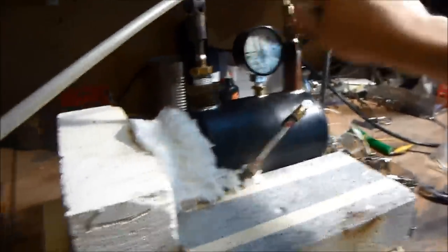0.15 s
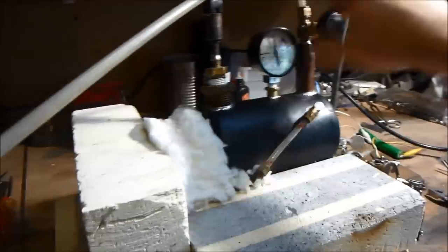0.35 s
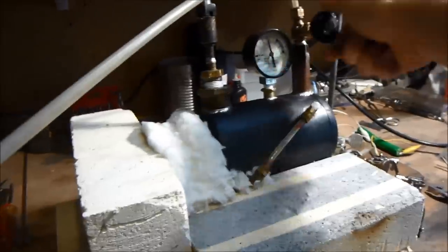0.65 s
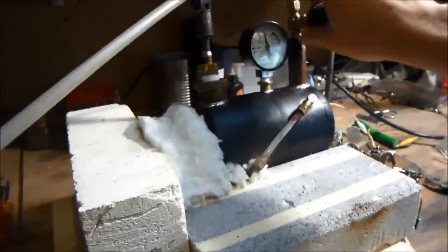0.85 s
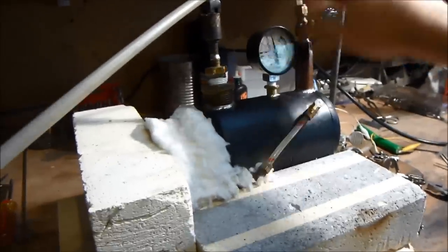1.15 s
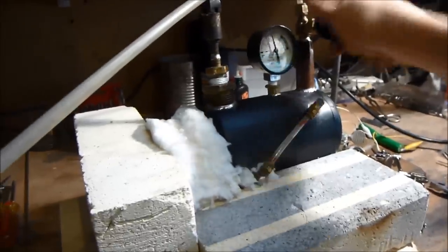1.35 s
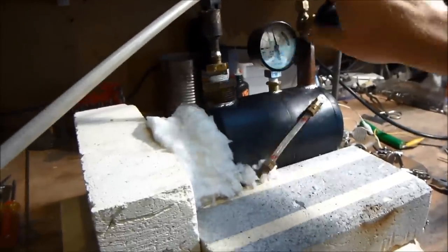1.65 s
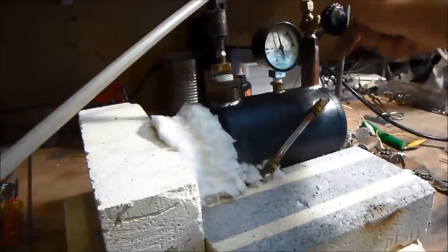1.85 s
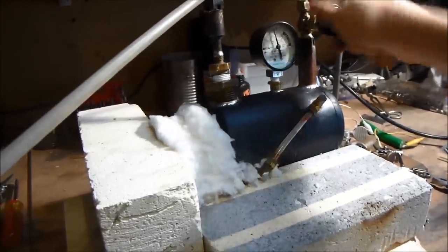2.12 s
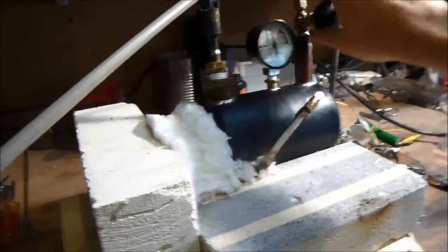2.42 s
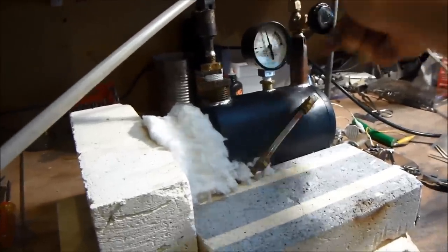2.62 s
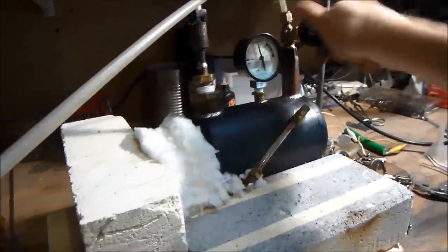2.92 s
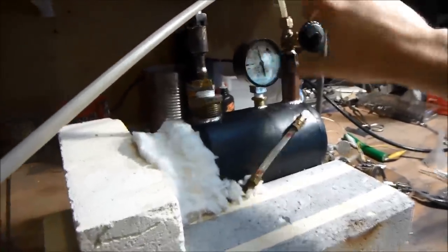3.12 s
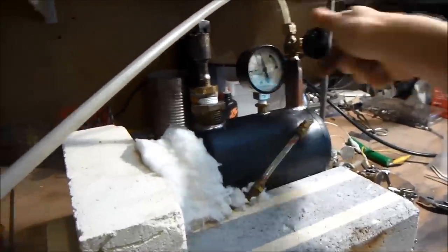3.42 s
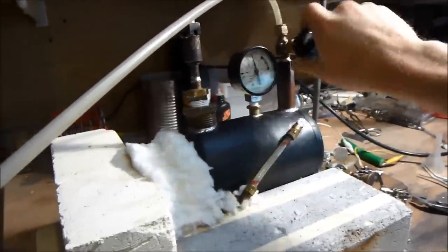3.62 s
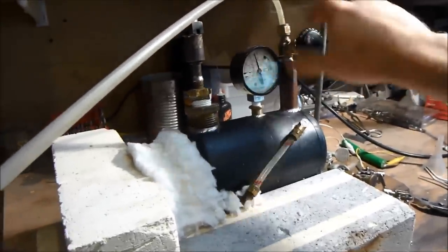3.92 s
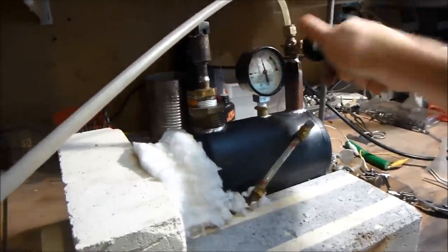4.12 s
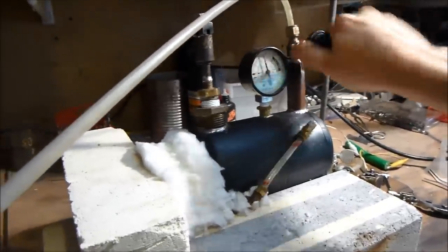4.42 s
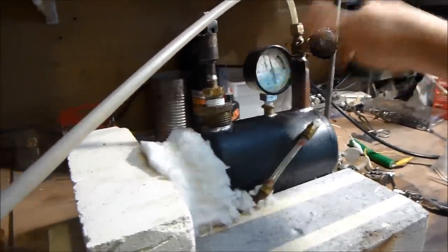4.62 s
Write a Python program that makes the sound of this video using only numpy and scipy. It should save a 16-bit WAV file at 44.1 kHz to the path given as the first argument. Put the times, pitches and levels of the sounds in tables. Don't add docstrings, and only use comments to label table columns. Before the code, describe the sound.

A small boiler on a workshop bench feeds pressurised steam through a hand valve and thin line. From 0 to about 4.8 seconds a loud, bright hiss runs without a break, strongest in the high treble, with a fine restless flutter. It begins a touch lower, swells by 0.4 seconds, eases around 0.75, then holds nearly level, with slight surges near 3.0 and 3.5. Beneath it, flow noise rings in the pipework and shell as a rough midrange rush leaning left, very gradually growing. A soft burner roar lies far below. The hand on the wheel makes faint, lumpy low thuds near 0.1, 0.5, 1.3, 3.3 and 4.2 seconds, the one at 1.3 strongest, with fainter touches near 2.2 and 4.0. The small stereo camera sounds close and wide, its treble slightly grainy; the extreme top opens intermittently, mostly after 3 seconds.

```python
import sys
import numpy as np
from scipy import signal
from scipy.fft import rfft, irfft
from scipy.io import wavfile
from scipy.ndimage import uniform_filter1d

SR = 44100
rng = np.random.default_rng(int(sys.argv[2]) if len(sys.argv) > 2 else 0)


def generate_wav(sig):
    pcm = np.round(np.clip(np.atleast_2d(sig).T, -1, 1) * 32767).astype(np.int16)
    wavfile.write(sys.argv[1], SR, pcm)


def linear_from_db(decibels):
    return 10 ** (np.asarray(decibels, float) / 20)


N = 210029

# f/Hz, level per Hz/dB, left-right/dB
JET_WASH = [(7200, -28, 0), (7400, -5, 2), (8500, -10, -3), (9700, -4, 2), (11000, -5, -3), (12000, -3, -2),
            (13000, -2, -3), (14000, 0, -3), (14600, -8, -3), (15200, -12, -1), (15700, -14, 0),
            (16000, -40, 0)]
# f/Hz, width/Hz, level over the wash/dB, left-right/dB, gain while opening/dB
JET_MODES = [(7630, 70, -1, 9, 5), (9930, 270, -2, 6, 4), (7990, 250, 3, 2, 3), (8110, 40, 3, 1, 7),
             (8290, 250, 6, 3, 6), (8540, 200, 6, 3, 1), (8700, 120, 5, 4, 2), (8840, 120, 4, 4, 0),
             (9060, 340, 3, 4, 2), (10310, 260, 1, 0, 5), (10710, 470, 7, 2, 7), (10980, 140, 8, 1, 4),
             (11160, 190, 7, 3, 7), (11280, 80, 6, 5, -3),
             (11470, 200, 8, 4, 0), (11820, 400, 10, 4, 0), (12180, 340, 11, 2, -3),
              (12520, 270, 11, 4, -6), (12870, 220, 1, 6, 0), (13020, 90, 6, 1, 1), (13350, 460, 5, 5, 5),
              (13680, 280, 9, 3, 2), (13850, 220, 10, 4, -1), (14120, 190, 8, 4, -6),
              (14340, 170, 5, 5, -5), (14550, 500, 6, 2, -2), (14820, 80, 4, 4, 0), (14990, 250, 5, 2, 0)]


def jet():
    hiss = turbulence(JET_WASH, JET_MODES, wash_same=0.89, mode_same=0.52,
                      wander_db=-0.5, patchy_db=0.5, ripple_db=2.0, twist_rad=0.88, fill_db=-0.5)
    return linear_from_db(pressure_db()) * flutter(0.22, 9.4, 100.0) * hiss


# t/s, jet level/dB
PRESSURE = [(0, -25.5), (.44, -23), (.75, -24.5), (1.3, -24.5), (2.0, -24), (2.3, -24), (3.05, -23),
            (3.3, -23.5), (3.5, -23), (3.85, -24.6), (4.3, -23.5), (4.76, -23.5)]


def pressure_db():
    at, db = np.transpose(PRESSURE)
    return np.interp(np.arange(N) / SR, at, db)


# f/Hz, level per Hz/dB, left-right/dB
PIPE_WASH = [(1350, -35, 0), (1450, -11, -3), (1800, -7, 3), (2300, 0, 6), (2800, -9, 5), (3300, -2, 5),
             (4300, -1, 6), (5200, -4, -3), (6200, -7, -3), (7400, -2, 4), (7600, -25, 0)]
# f/Hz, width/Hz, level over the wash/dB, left-right/dB, gain
# while opening/dB
PIPE_MODES = [(1646, 280, 10, 6, 2), (1895, 60, 0, 14, 1), (2080, 60, 7, 5, 4), (2170, 190, 1, 10, 5),
              (2630, 140, 2, 7, 0), (2880, 120, -3, 12, 6), (3140, 90, 6, 7, 2), (3330, 80, 6, 8, -1),
              (3480, 70, 5, 11, -2), (3630, 110, 2, 6, -2), (3730, 70, 6, 9, 0), (3940, 140, 8, 4, -2),
              (4050, 50, 4, 10, 1), (4180, 160, 4, 7, -3),
              (4580, 180, 8, 6, 0), (4810, 170, 9, 3, 0), (5140, 230, 4, 6, -2), (5270, 120, 4, 10, -1),
              (5440, 140, 5, 7, -1), (5660, 280, 6, 4, 0), (5850, 150, 6, 8, 1), (6000, 60, 5, 4, 7),
              (6160, 240, 7, 4, -1), (6320, 250, 5, 4, -1), (6580, 140, 9, 3, 5), (6760, 380, 6, 3, 2),
              (7190, 200, -2, -3, 5)]


def pipework():
    hiss = turbulence(PIPE_WASH, PIPE_MODES, wash_same=0.58, mode_same=0.53,
                      wander_db=0.42, patchy_db=0.33, ripple_db=2.12, twist_rad=0.55, fill_db=0.5)
    filling = follower(start_db=-30, rise_db_per_s=0.48, share=0.14)
    return filling * flutter(0.49, 6.3, 30.0) * hiss


# f/Hz, level per Hz/dB, left-right/dB
BURNER_WASH = [(120, -37, 0), (158, -11.5, -3), (228, 2, 0), (416, 1, 3), (700, -3.5, 5), (1065, -4.5, 5),
               (1424, -2.5, 0), (1620, 1, 0)]
# f/Hz, width/Hz, level over the wash/dB, left-right/dB, gain while opening/dB
BURNER_MODES = [(191.4, 51, 11.2, -2.5, -3), (273.6, 25.5, 14.9, 2.5, 2.5), (352.4, 116, 10.8, -1, -2.1),
                (558, 315, 8.8, -2, 1.5), (772, 108, 12.1, -2, 0), (921.5, 54, 10.5, 15, -3),
                (1054, 115, 13.2, -8.5, -2), (1261, 96, 9.5, 18.5, -0.5), (1396, 140, 9, 14, -1.5)]


def burner():
    roar = turbulence(BURNER_WASH, BURNER_MODES, wash_same=0.54, mode_same=0.79,
                      wander_db=-0.17, patchy_db=0.63, ripple_db=1.84)
    flame = follower(start_db=-48.5, rise_db_per_s=0.7, share=0.047)
    return flame * flutter(0.37, 2.5, 14.0) * roar


def follower(start_db, rise_db_per_s, share):
    surge_db = pressure_db() - pressure_db().mean()
    return linear_from_db(start_db + rise_db_per_s * np.arange(N) / SR + share * surge_db)


# f/Hz, level per Hz/dB, left-right/dB
RUMBLE_WASH = [(40, -30, 0), (65, -12, 0), (90, -11, 0), (116, 7, 0), (147.6, 12.5, 0), (188, -42, 0)]
# f/Hz, width/Hz, level over the wash/dB, left-right/dB, gain while opening/dB
BENCH_MODE = [(105, 40, -20, 0, 0)]


def rumble():
    lumps = turbulence(RUMBLE_WASH, BENCH_MODE, 0.65, 0.65, wander_db=0, patchy_db=0, ripple_db=0)
    power = uniform_filter1d(lumps.mean(0) ** 2, size=2500)
    return thuds() * lumps / np.sqrt(power + 0.05)


# t/s, level/dB
THUDS = [
    (0.089, -53),
    (0.525, -54.5),
    (1.344, -47),
    (2.169, -58),
    (3.306, -52),
    (3.993, -58),
    (4.179, -54),
]
# start t/s, length/s
LULLS = [(0.174, .28), (0.718, 0.057), (.86, 0.05), (1.08, .12), (1.5, .04), (1.87, .08), (2.27, 0.15),
         (2.482, 0.11), (2.65, .07), (2.808, .09), (3.11, 0.12), (3.86, 0.047), (4.23, .08), (4.6, 0.064)]


def thuds():
    rise_s, t60_s, edge_s = 0.03, 0.4, 0.04
    t = np.arange(0, N + 64, 64) / SR
    at, db = np.transpose(THUDS)
    since = np.maximum(t - at[:, None] + rise_s, 0)
    decay = linear_from_db(db[:, None] - 3.5 - 60 * since / t60_s)
    swell = np.minimum(since / rise_s, 1) * decay
    tremor = linear_from_db(-65.5 + 2.5 * chance(t, 3.0, 14.0)[0])
    still = 0
    for start, length in LULLS:
        inside_s = np.minimum(t - start, start + length - t)
        still = still + np.clip(0.5 + inside_s / edge_s, 0, 1)
    gain = np.sqrt((swell ** 2).sum(0) + tremor ** 2) * linear_from_db(-14 * still)
    return np.interp(np.arange(N) / SR, t, gain)


# f/Hz, level per Hz/dB, left-right/dB
HISS_WASH = [(5, 0, 0), (25, 12, 0), (50, -38, 0), (90, -41, 0), (200, -38, 0)]


def microphone_drift():
    return linear_from_db(-70) * turbulence(HISS_WASH, BENCH_MODE, 0.1, 0.1, wander_db=0, patchy_db=0, ripple_db=0)


def turbulence(wash, modes, wash_same, mode_same, wander_db, patchy_db, ripple_db, twist_rad=0.47, fill_db=0.):
    frames, hz = N // 512 + 5, np.fft.rfftfreq(2048, 1 / SR)
    t = np.arange(frames) * 512 / SR
    opening = t * SR / N - 0.5
    side = np.array([0.5, -0.5])[:, None, None]

    at, wash_db, wash_pan = np.transpose(wash)
    log_hz = np.log(hz + 1)
    shape_db = np.interp(log_hz, np.log(at), wash_db)[:, None]
    pan_db = np.interp(log_hz, np.log(at), wash_pan)[:, None]
    shape = linear_from_db(shape_db) * ((hz >= at[0]) & (hz <= at[-1]))[:, None]
    scattered = linear_from_db(side * pan_db + fill_db * opening) ** 2

    f, width, db, lean_db, growth_db = np.transpose(modes)
    peaks = 1 / (1 + (2 * (hz[:, None] - f) / (0.74 * width)) ** 2) ** 2
    wander = wander_db * chance(t, 0.4, 5.0, count=len(f))
    mode_db = db[:, None] + 1.6 + growth_db[:, None] * opening + wander
    ringing = peaks @ linear_from_db(mode_db + side * lean_db[:, None]) ** 2
    power = scattered + ringing
    shared = (wash_same * scattered + mode_same * ringing).sum(0) / power.sum(0)

    a, b, c, d, patches, ripple, twist = rng.standard_normal((frames, len(hz), 7)).T
    twist = smoothed(twist, 8, 200, "reflect")
    ripple = smoothed(ripple, 2, 16, "wrap")
    patches = smoothed(patches, 20, 5, "wrap")

    same = np.clip(shared + 0.18 * ripple, 0, 1)
    left, other = a + 1j * b, c + 1j * d
    turn = np.exp(1j * twist_rad * twist)
    z = np.array([left, same * turn * left + np.sqrt(1 - same ** 2) * other])
    z *= shape * np.sqrt(power) * linear_from_db(patchy_db * patches + ripple_db * ripple)
    sound = signal.istft(z, nperseg=2048, noverlap=1536)[1][:, :N]
    return sound / np.sqrt(np.mean(sound.mean(0) ** 2))


def smoothed(grain, bins, frames, edge):
    grain = uniform_filter1d(grain, size=bins, axis=0)
    return evened(uniform_filter1d(grain, size=frames, axis=1, mode=edge))


def flutter(depth_db, lo_hz, hi_hz):
    t = np.arange(0, N + 64, 64) / SR
    curve = chance(t, lo_hz, hi_hz)[0]
    return linear_from_db(depth_db * np.interp(np.arange(N) / SR, t, curve))


def chance(t, lo_hz, hi_hz, count=1):
    rate = np.geomspace(lo_hz, hi_hz, 24) * rng.uniform(0.9, 1.1, (count, 24))
    phase = rng.random((count, 24))
    waves = (np.sin(2 * np.pi * (f[:, None] * t + p[:, None])) for f, p in zip(rate.T, phase.T))
    return evened(sum(waves))


def evened(x):
    return x / np.sqrt(np.mean(x ** 2) + 1e-20)


def scene():
    return jet() + pipework() + burner() + rumble() + microphone_drift()


# f/Hz, centre level/dB, difference level/dB
MARGINS = [(800, 15, 11), (1200, 16, 11), (2800, 10.8, 9.5), (4200, 10.5, 9), (6000, 7.5, 5),
           (7800, 5.5, 2.8), (9800, 7.2, 4), (11500, 10, 8), (13500, 13, 13), (15000, 11, 10)]


def squelch(x, depth_db):
    mid_side = np.array([x[0] + x[1], x[0] - x[1]]) / 2
    hz, _, z = signal.stft(mid_side, SR, nperseg=2048, noverlap=1536)
    at, *margins = np.transpose(MARGINS)
    margin_db = np.array([np.interp(hz, at, m) for m in margins])[:, :, None]
    power = abs(z) ** 2
    narrow = uniform_filter1d(uniform_filter1d(power, size=6, axis=1), size=3, axis=2)
    wide = uniform_filter1d(uniform_filter1d(power, size=70, axis=1), size=12, axis=2)
    under_db = 10 * np.log10((abs(wide) + 1e-18) / (abs(narrow) + 1e-18)) - margin_db
    sunk = 1.0 * ((under_db > 0) & (hz > at[0])[:, None])
    muted = uniform_filter1d(uniform_filter1d(sunk, size=3, axis=1), size=2, axis=2) > 0.1
    z = z * linear_from_db(-depth_db * muted)
    centre, difference = signal.istft(z, nperseg=2048, noverlap=1536)[1][:, :N]
    return np.array([centre + difference, centre - difference])


# start t/s, end t/s
TOP_OPEN = [(2.216, 2.264), (2.521, 2.567), (2.985, 3.239), (3.26, 3.357), (3.38, 3.471), (3.493, 3.612),
            (3.705, 3.751), (3.795, 3.911), (3.959, 4.071), (4.12, 4.238), (4.259, 4.307), (4.378, 4.764)]


def top_band(x, edge_hz, top_db):
    above = np.fft.rfftfreq(N, 1 / SR) > edge_hz
    top = irfft(rfft(x) * above, N)
    t = np.arange(N) / SR
    gate = sum((t > start + 0.009) & (t < end - 0.009) for start, end in TOP_OPEN)
    gate = signal.oaconvolve(gate, np.hanning(600) / 300, "same")
    return x - top + gate * linear_from_db(top_db) * top.mean(0)


def low_pass(x):
    return signal.sosfilt(signal.butter(12, 15600, fs=SR, output="sos"), x)


OFFSET = [
    [-.0029],
    [-.0026],
]


def record(dry):
    thinned = squelch(dry, depth_db=35)
    thinned = top_band(thinned, edge_hz=15210, top_db=7)
    return low_pass(thinned + OFFSET)


dry = scene()
out = record(dry)
generate_wav(out)
```